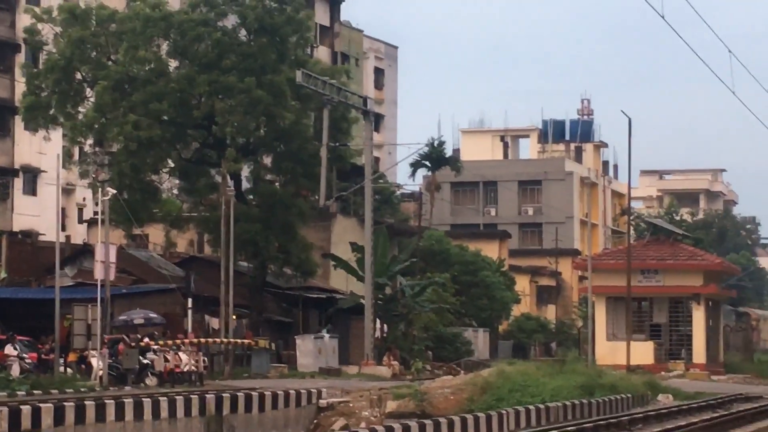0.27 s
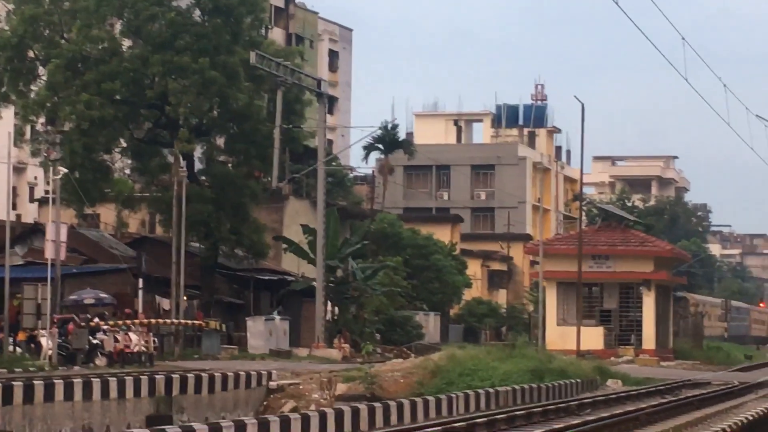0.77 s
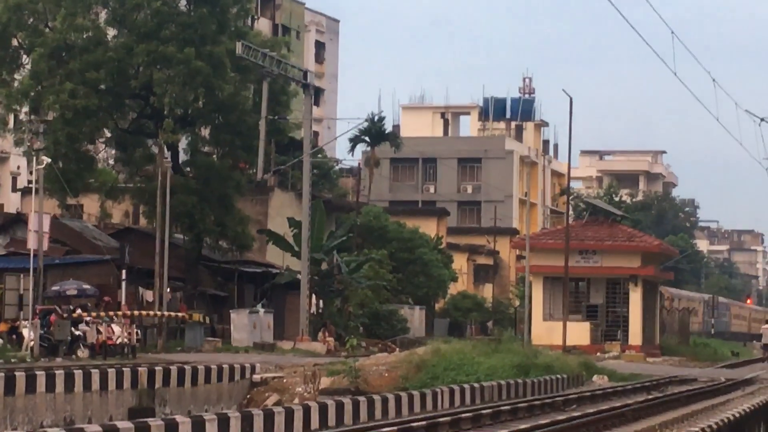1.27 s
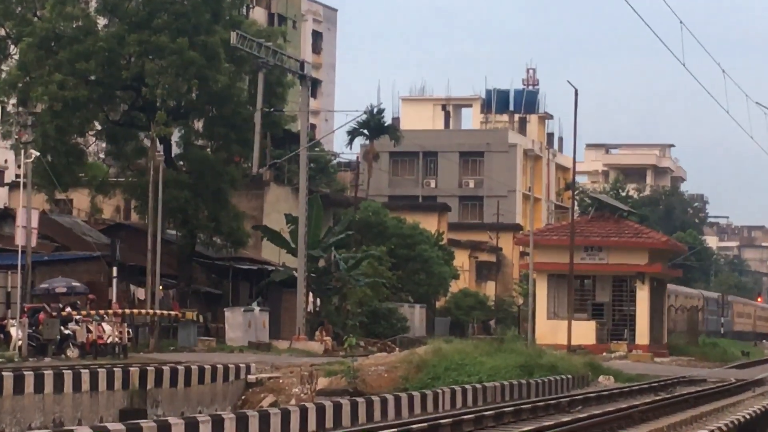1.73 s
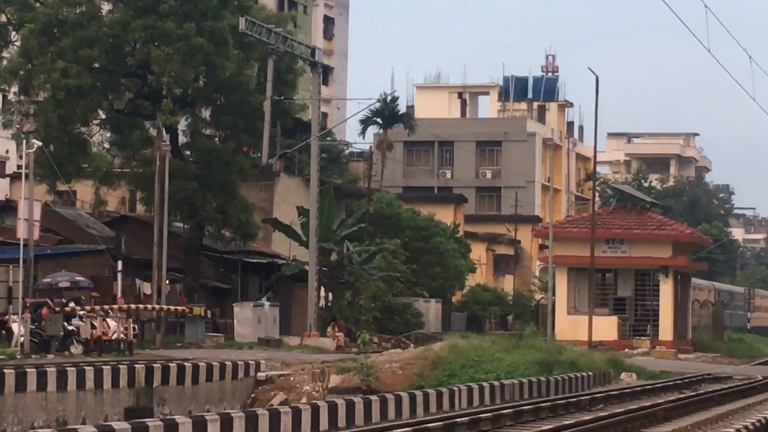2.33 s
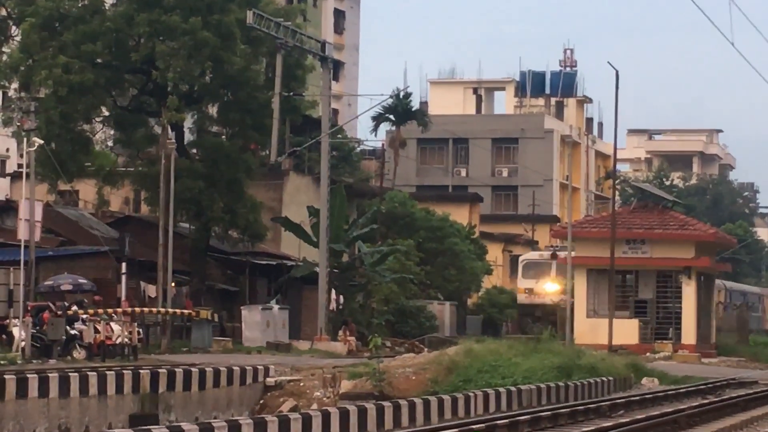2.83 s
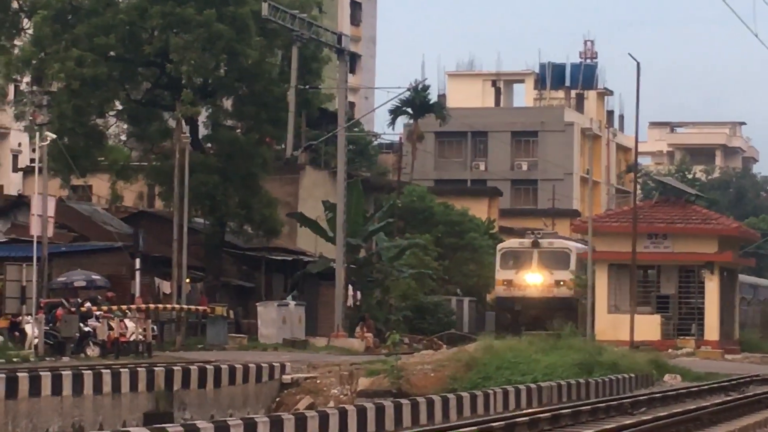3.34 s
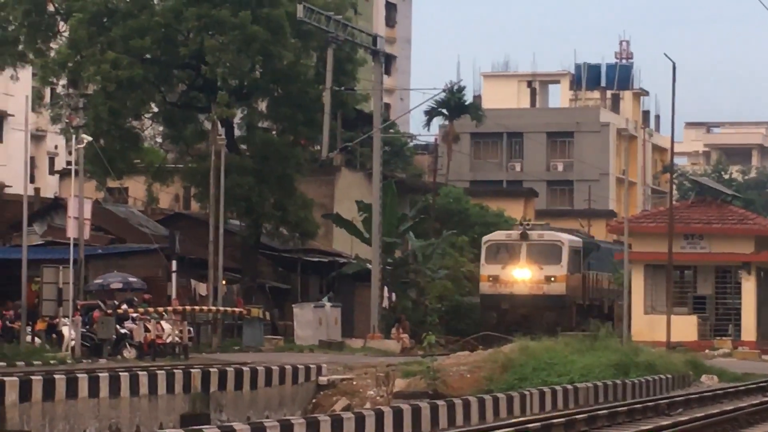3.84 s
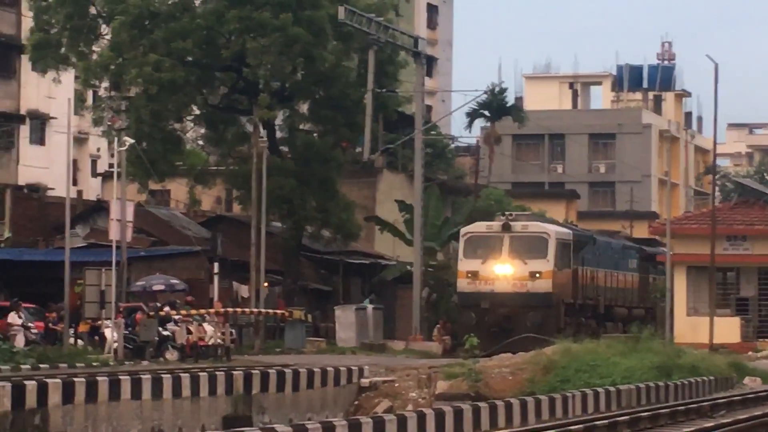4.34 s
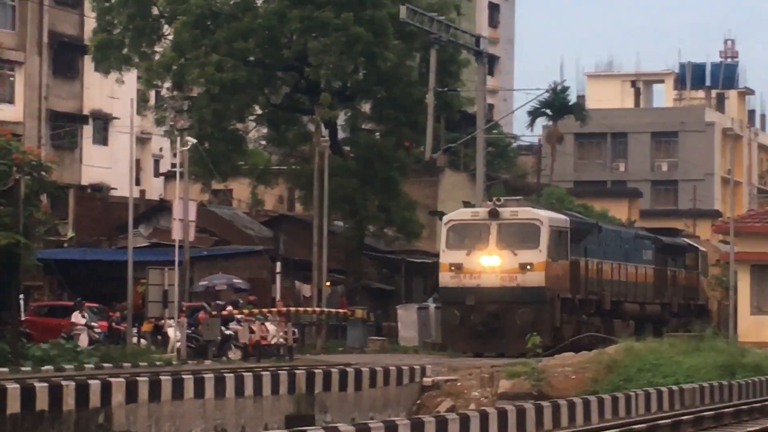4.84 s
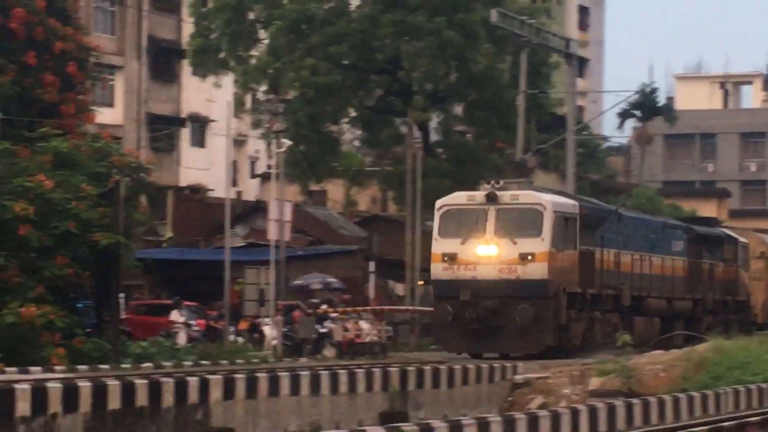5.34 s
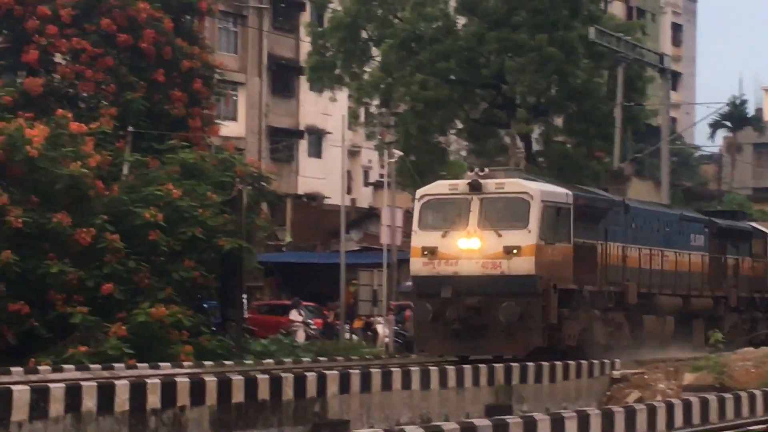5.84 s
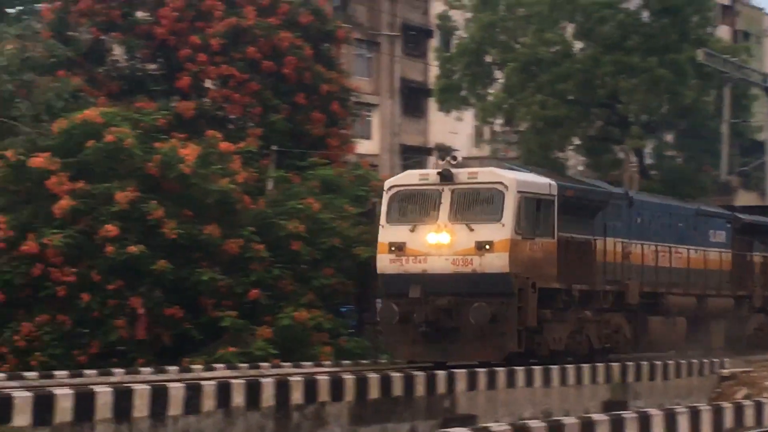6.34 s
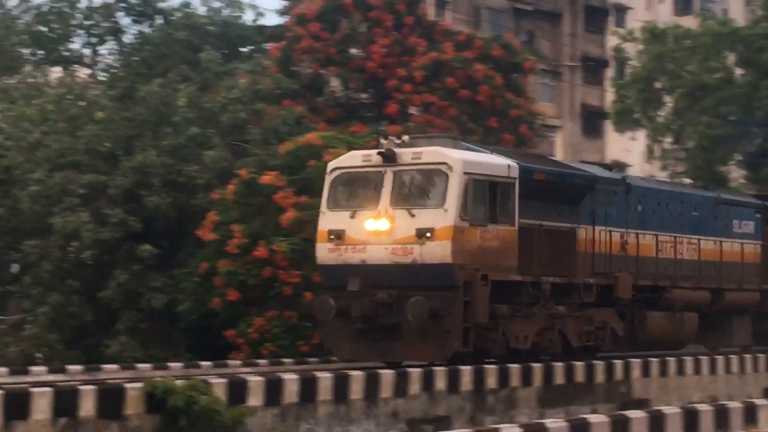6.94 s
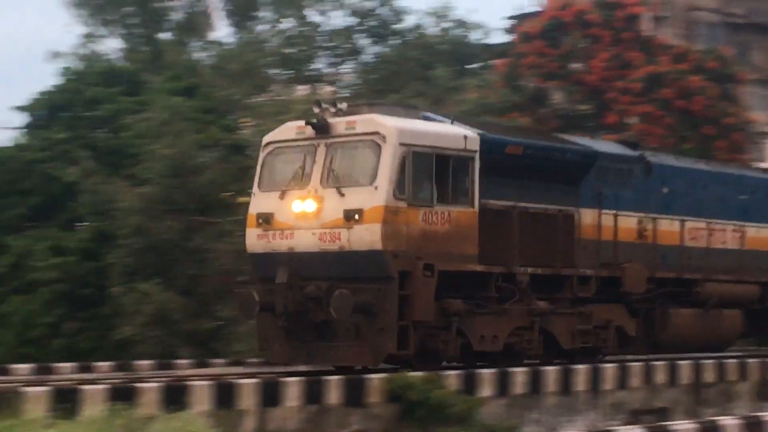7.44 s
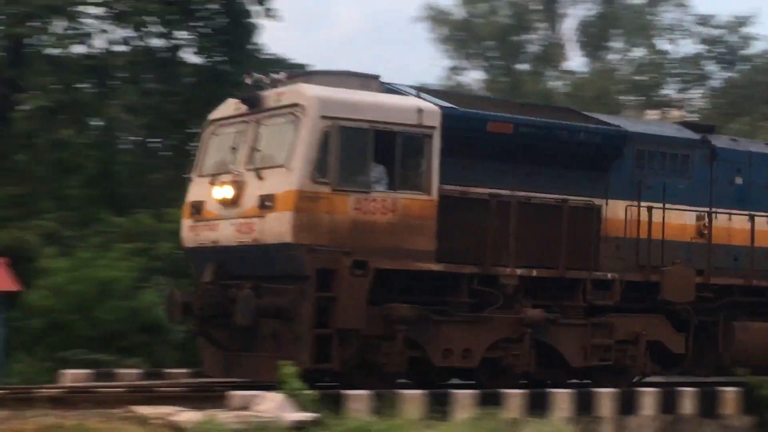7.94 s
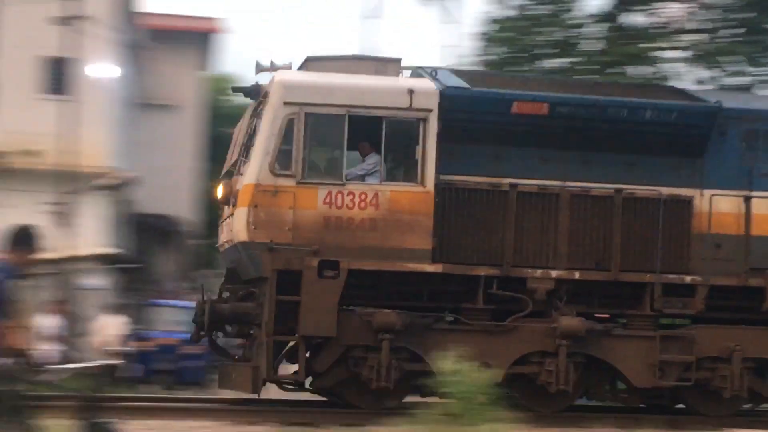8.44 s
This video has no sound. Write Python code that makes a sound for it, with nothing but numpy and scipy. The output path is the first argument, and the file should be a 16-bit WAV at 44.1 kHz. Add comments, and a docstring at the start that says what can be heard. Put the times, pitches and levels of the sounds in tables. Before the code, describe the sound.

A diesel locomotive pulls a passenger train towards a listener beside the track, between houses. Its deep exhaust drone wavers with echoes at first, then grows louder and throbs. Wheels and fans roar and hiss, with a few faint knocks and squeaks, while blowers whine and a thin turbocharger whistle rises. Near the end, as the cab draws level, a two-note air horn blares and sinks slightly in pitch.

```python
"""A diesel locomotive drones as it pulls a passenger train towards a listener between house fronts.
Its exhaust puffs blend into a deep tone, smeared by echoes at first and throbbing once per engine turn
when near. Wheels and fans roar, with a few knocks and squeaks; blowers whine and the turbocharger sings
high above. As the cab draws level, air blows through a two-note horn, which sinks in pitch."""
import sys
import numpy as np
from scipy import signal
from scipy.fft import rfft, irfft, next_fast_len
from scipy.io import wavfile
from scipy.ndimage import uniform_filter1d, map_coordinates

SR = 44100
rng = np.random.default_rng(int(sys.argv[2]) if len(sys.argv) > 2 else 0)


def output_pcm(signal):
    """Save a mono or channel-first signal as 16-bit PCM at the path in sys.argv[1].

    Samples are clipped to [-1, 1] before scaling.
    """
    pcm = np.clip(np.atleast_2d(signal).T, -1, 1) * 32767
    wavfile.write(sys.argv[1], SR, np.round(pcm).astype(np.int16))


N = 383669
T = np.arange(N) / SR


def undb(db):
    """Turn decibels into a factor to multiply by."""
    return 10 ** (np.asarray(db) / 20)


def curve(table):
    """Join rows of (time, value) with straight lines."""
    return np.interp(T, *np.transpose(table))


def swells(table):
    """Smooth rises or dips, one for each row of t/s, change/dB, half length/s."""
    return sum(db * np.exp(-((T - s) / half_s) ** 2) for s, db, half_s in table)


def drift(rate):
    """Wander smoothly by about 1 either way, through `rate` random points a second."""
    points = rng.standard_normal(int(N / SR * rate) + 4)
    coarse = map_coordinates(points, [T[::64] * rate], order=3, mode="nearest")
    return np.interp(T, T[::64], coarse)


def lowpass(x, hz):
    """Gently take away the treble without delaying the sound."""
    return signal.sosfiltfilt(signal.butter(2, hz, fs=SR, output="sos"), x)


def noise(spectrum, band=(0, SR), skirt_db=40, ripple_db=0):
    """Noise shaped by rows of f/Hz, level/dB, with strength (rms) 1 inside the band."""
    size = next_fast_len(N)
    f = np.arange(size // 2 + 1) * SR / size + 1
    hz, db = np.transpose(spectrum)
    octaves_outside = np.abs(np.log2(f / np.clip(f, hz[0], hz[-1])))
    # random bumps every 45 Hz stand for many close resonances
    ripple = map_coordinates(rng.standard_normal(size=2048), [f / 45], order=1, mode="wrap")
    gain = undb(np.interp(np.log(f), np.log(hz), db) - skirt_db * octaves_outside + ripple_db * ripple)
    gain /= np.sqrt(np.mean(gain ** 2 * ((f > band[0]) & (f < band[1]))))
    return irfft(rfft(rng.standard_normal(size)) * gain, size)[:N]


# faint wheel squeaks: t/s, level/dB, f/Hz, half length/s
WHEEL_SQUEAKS = [(3.28, -47, 3510, .06), (4.77, -45, 3500, .05)]

def squeaks():
    """A wheel's rim rubs the rail and sings roughly for a moment."""
    out = 0
    for s, db, hz, half_s in WHEEL_SQUEAKS:
        ring = noise([(hz - 25, 0), (hz + 25, 0)], skirt_db=400)
        out += ring * undb(db) * np.exp(-((T - s) / half_s) ** 2)
    return out


# short knocks and clinks, then two longer surges: t/s, level/dB, f/Hz, time to fade by 30 dB/s
KNOCKS_AND_SURGES = [(2.05, -43, 3500, .25), (2.315, -33.5, 2200, 0.04), (2.7, -42, 3500, 0.28),
                     (4.322, -38, 4200, 0.097), (6.29, -33, 4200, 0.26), (6.855, -28, 453, 0.11),
                     (7.33, -34, 3800, .25), (7.39, -27, 950, .55), (7.68, -28, 900, .35)]

def knocks_and_surges():
    """Fading noise bursts: knocks and clinks, plus two mid-pitched surges of roar just before the horn."""
    out = 0
    for s, db, hz, decay_s in KNOCKS_AND_SURGES:
        burst = noise([(hz * .88, 0), (hz * 1.12, 0)], skirt_db=28)
        out += burst * (T > s) * undb(db - 30 * np.abs(T - s) / decay_s)
    return out


# the roar grows as the train nears: t/s, level/dB
ROAR_RISE = [(0, -46), (1.5, -45), (2.15, -42), (3.2, -43.5), (4.4, -39.5), (5.2, -36), (6.4, -32.5),
             (7.15, -32.5), (7.7, -30)]
# the hiss grows as the engine clears the buildings: t/s, level/dB
HISS_RISE = [(0, -62.5), (2.2, -59), (3.4, -57), (5.1, -48.5), (6.6, -45), (8.7, -41.5)]
# surges of hiss from the wheels: t/s, rise/dB, half length/s
HISS_SURGES = [(1.65, 3, 0.13), (2.7, 6, 0.13), (2.88, 6.5, 0.083), (4.36, 1, 0.053), (5.78, 2, 0.12),
               (6.33, 5, 0.11), (6.68, 2.5, 0.048), (6.88, 5, 0.048), (7.37, 3, 0.054), (7.8, 3, 0.075),
               (8.66, 3, .09)]

def train_levels():
    """Base levels in dB of roar, hiss and turbocharger: all grow, then dip under the horn."""
    roar_db, hiss_db = curve(ROAR_RISE), curve(HISS_RISE)
    turbo_db = -34.4 + 1.41 * (hiss_db + 45)  # follows the hiss, but more steeply
    surge_db = swells(HISS_SURGES)
    dip_db = curve([(7.82, 0), (7.97, -6.5)])
    return roar_db + dip_db, hiss_db + surge_db + dip_db, turbo_db + .9 * surge_db + dip_db


# blower and gear tones: f/Hz, relative level/dB
WHINE_TONES = [(245, -20.5), (378, -18.5), (628, -15), (1146, -10.5), (1465, -5.5), (3773, -15),
               (7545, -31)]
# a hum that swells just before the horn: t/s, level/dB
HUM_SWELL = [(0, -54.5), (5, -53), (6.5, -40.5), (7.2, -39.5), (7.55, -33.5), (7.8, -36), (7.95, -58)]

def whines(roar_db, doppler, hum_hz=314):
    """Blowers and gears sing wavering tones that rise out of the roar as the engine nears."""
    def tone(hz):
        """One slightly unsteady pure tone."""
        wavering_hz = hz * doppler * (1 + .0012 * drift(20))
        return np.sqrt(2) * np.sin(2 * np.pi * np.cumsum(wavering_hz) / SR)
    level_db = roar_db - 4 + .25 * (roar_db + 31.5)
    tones = sum(tone(hz) * undb(level_db + db + 3 * drift(5)) for hz, db in WHINE_TONES)
    hum_db = curve(HUM_SWELL) + 2 * drift(9)
    return tones + tone(hum_hz) * undb(hum_db)


# tone colour of the turbocharger: f/Hz, relative level/dB
TURBO_SPECTRUM = [(10300, -35), (10750, -10.5), (11250, -5), (11720, 1.5), (12000, -15), (12500, -13),
                  (13300, -20)]

def turbocharger(level_db, flicker_db=1):
    """Spinning blades squeeze air into the engine with a thin, airy whistle."""
    return noise(TURBO_SPECTRUM) * undb(level_db + flicker_db * drift(45))


# tone colour of the roar: f/Hz, relative level/dB
ROAR_SPECTRUM = [(200, -1), (270, -6), (460, -5.5), (525, 0.5), (700, -1), (1100, 0), (1450, -2),
                 (1700, -5.5), (2600, -8), (3600, -7), (4500, -10.5), (4950, -15), (5800, -12.5),
                 (7000, -19)]
# tone colour of the hiss: f/Hz, relative level/dB
HISS_SPECTRUM = [(4950, -10.5), (5700, -1.5), (6600, -1), (7800, -5), (9600, -3.5), (10400, -7),
                 (13000, -16), (15600, -12)]
# the very top of the hiss, which air soaks up while the train is far: t/s, change/dB
HISS_TOP = [(0, -10), (4, -4), (6.3, -8), (7.6, 4), (8.1, 12), (8.7, 10)]

def wheels_and_fans(roar_db, hiss_db):
    """Wheels and fans roar and hiss, brighter as the train comes near."""
    roar = noise(ROAR_SPECTRUM, band=(900, 1260), skirt_db=60, ripple_db=.8)
    low_roar = lowpass(roar, 1700)
    hiss = noise(HISS_SPECTRUM, band=(7700, 10200))
    soft_hiss = lowpass(hiss, 12500)
    hiss = soft_hiss + (hiss - soft_hiss) * undb(curve(HISS_TOP))
    flutter_db = .5 * drift(20)
    low = low_roar * undb(roar_db + 1.38 + .13 * drift(18))
    middle = (roar - low_roar) * undb(.61 * roar_db + .43 * hiss_db + 6 + flutter_db)
    return low + middle + hiss * undb(hiss_db + .2 + flutter_db)


# horn echoes off house fronts: delay/s, level/dB
WALL_ECHOES = [(.13, -25), (.51, -16)]

def street_echoes(x, fade_db_per_s=60 / 5.1, wash_db=-17):
    """Houses and trees send back two dull echoes and a one-second wash of sound."""
    echoes = sum(undb(db) * np.interp(T - delay_s, T, x) for delay_s, db in WALL_ECHOES)
    t = T[:SR]
    tail = rng.standard_normal(SR) * undb(-fade_db_per_s * t) * (t > .02)
    tail = signal.sosfilt(signal.butter(1, 2480, fs=SR, output="sos"), tail)
    wash = signal.fftconvolve(x, tail / np.sqrt(np.sum(tail ** 2)))[:N]
    return lowpass(echoes, 1700) + undb(wash_db) * wash


def horn_note(hz, tones, start_s, rise_s=.029, bloom_s=.021):
    """Air shakes a metal disc: the note starts pure and turns brassy once the disc slaps its seat."""
    phase = 2 * np.pi * np.cumsum(hz * (1 + .00077 * drift(120))) / SR
    out = 0
    for k, db in tones:
        opening = np.clip((T - start_s - bloom_s * (1 - 1 / k)) / rise_s, 0, 1)
        # high tones waver most on the changing path over the ground
        waver_db = 2 * min(k / 7, 1) * drift(12)
        out += opening * undb(db + waver_db) * np.sin(k * phase + rng.uniform(0, 2 * np.pi))
    return np.sqrt(2) * out


# tones of the high horn: multiple of its pitch, relative level/dB, extra fade/(dB per s)
HIGH_HORN_TONES = [(1, -0.5, 0.5), (2, 0, 11), (3, -3, 3), (4, -10, 2.5), (5, -8.5, 29), (6, -24, 1),
                   (7, -22, -0.5), (8, -23, 0), (9, -23, -4), (10, -24, 2), (11, -32.5, -1), (12, -31.5, 0),
                   (13, -30, 0), (14, -29, 1), (15, -33, 1), (16, -38, 0)]
# its second tone drops out briefly: t/s, change/dB, half length/s
HORN_DROPOUTS = [(7.87, -16, 0.019), (8.3, -16, 0.055)]
# tones of the low horn: multiple of its pitch, relative level/dB
LOW_HORN_TONES = [(1, -0.5), (2, -2), (3, -8.5), (4, -9.5), (5, -26), (6, -38), (7, -40), (8, -41),
                  (9, -33), (10, -41), (11, -29)]

def horns(high_start_s=7.781, low_start_s=7.806, pitch_hz=438.7, low_ratio=.711, rush_s=.07):
    """Two air horns, about half an octave apart, sink and fade as they pass and turn away."""
    high_age, low_age = np.maximum(T - high_start_s, 0), np.maximum(T - low_start_s, 0)
    hz = pitch_hz + 10.5 * np.exp(-high_age / .085) - 12.5 * high_age  # starts sharp, settles, sinks
    high_db, low_db = -16.5 - 5.5 * high_age, -21.5 - 6 * low_age
    # the first rush of air briefly changes the level of each horn's lowest tone
    high_extra_db = {1: 8.5 * np.exp(-high_age / rush_s), 2: swells(HORN_DROPOUTS)}
    low_rush_db = -.5 * np.exp(-low_age / rush_s)
    high = [(k, high_db + db - fade * high_age + high_extra_db.get(k, 0))
            for k, db, fade in HIGH_HORN_TONES]
    low = [(k, low_db + db + low_rush_db * (k == 1)) for k, db in LOW_HORN_TONES]
    both = horn_note(hz, high, high_start_s) + horn_note(hz * low_ratio, low, low_start_s)
    return both + street_echoes(both)


# the drone swells between the houses: t/s, level/dB
DRONE_LEVEL = [(0, -27), (.2, -22), (.5, -26), (.87, -18.5), (1.2, -25), (1.42, -21), (2.6, -19.5),
               (3.0, -15.5), (3.55, -19.5), (4.1, -18.5), (4.6, -16), (5.35, -16), (5.72, -17), (6.92, -10),
               (7.42, -15), (7.75, -11.5), (7.97, -21.5), (8.45, -18), (8.7, -21.5)]
# echoes briefly cancel the far-off drone: t/s, change/dB
ECHO_DIPS = [(.37, -11), (.63, -8), (1.26, -11), (1.45, -3.5), (1.6, -3), (1.82, -5), (2.04, -10),
             (2.69, -9), (3.6, -3.5), (3.87, -16), (4.05, -10), (4.36, -6), (4.56, -7)]
# how much exhaust sound bounces off the houses: t/s, relative level/dB
ECHO_SHARE = [(0, -2.5), (2.5, -6), (4, 1.5), (5.5, -10.5), (6.4, -13), (8.7, -13)]
# the throb deepens as the exhaust pipe comes into view: t/s, relative level/dB
THROB_DEPTH = [(0, -8), (4, -11), (5.6, 2.5), (6.4, 2.5), (8.7, 1.5)]
# exhaust tones: multiple of the engine speed, relative level/dB
EXHAUST_TONES = [(3, -70), (4, -50), (5, -21.5), (6, -17.5), (7, -7), (8, 7.5), (9, -5.5), (10, -7),
                 (11, -23), (12, -49), (13, -27), (14, -32), (15, -26), (16, -30), (17, -41)]
# tone colour of the swirling gas: f/Hz, relative level/dB
GAS_RUMBLE = [(24, -26), (32, -17), (40, -3), (60, -2.5), (95, 9), (140, 2), (210, -10.5), (260, -22),
              (400, -16.5)]

def exhaust(engine_hz, puffs_per_turn=8, weak_spot_s=6.933):
    """Even puffs make a drone, one weak spot a turn makes it throb, and echoes make each tone waver."""
    level_db = curve(DRONE_LEVEL) + swells([(s, db, .043) for s, db in ECHO_DIPS])
    echo_db, throb_db = curve(ECHO_SHARE), curve(THROB_DEPTH)
    turns = np.cumsum(engine_hz) / SR
    turns -= np.interp(weak_spot_s, T, turns)
    core = outer = 0  # tones close to the puff rate, and all the others
    for k, db in EXHAUST_TONES:
        # the weak spot adds tones between the multiples of the puff rate
        on_puff = k % puffs_per_turn == 0
        direct = 1 if on_puff else -undb(throb_db)
        echoed = undb(echo_db - 2.7 * on_puff) * (drift(7) + 1j * drift(7))
        tone = undb(db) * (direct + echoed) * np.exp(2j * np.pi * k * turns)
        if abs(k - puffs_per_turn) <= 2:
            core += tone
        else:
            outer += tone * undb(4 * on_puff)
    # only the core takes the deep dips; the rest follows a smoothed level
    core_power = uniform_filter1d(np.abs(core) ** 2, size=6630) / 2
    drone = core.real / np.sqrt(core_power) * undb(level_db)
    smooth_db = uniform_filter1d(level_db, size=18000)
    rumble = noise(GAS_RUMBLE) * undb(.46 * smooth_db - 21)
    return drone + outer.real * undb(smooth_db + .16 * throb_db) + rumble


# engine turns per second as heard, sinking as it draws level: t/s, f/Hz
ENGINE_SPEED = [(0, 13.22), (3.8, 13.26), (4.3, 13.31), (6.4, 13.31), (7.5, 13.26), (8.1, 13.18),
                (8.7, 13.1)]

def scene():
    """Mix the train; exhaust and whines share one drop in pitch as it passes (the Doppler effect)."""
    engine_hz = curve(ENGINE_SPEED)
    doppler = engine_hz / np.max(engine_hz)
    roar_db, hiss_db, turbo_db = train_levels()
    train = exhaust(engine_hz) + wheels_and_fans(roar_db, hiss_db)
    train += turbocharger(turbo_db) + whines(roar_db, doppler)
    return (train + knocks_and_surges() + squeaks() + horns())[None]


def record(dry, knee=.72, room=.2, top_hz=15750):
    """Round off the tallest peaks and cut the highest treble."""
    held = np.clip(dry, -knee, knee)
    rounded = held + room * np.tanh((dry - held) / room)
    return signal.sosfilt(signal.ellip(10, .1, 80, top_hz, fs=SR, output="sos"), rounded)


dry = scene()
out = record(dry)
output_pcm(out)
```